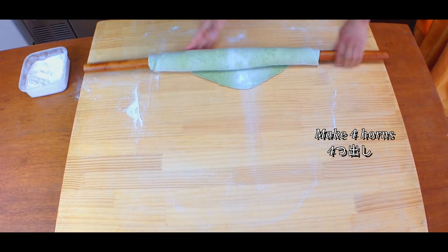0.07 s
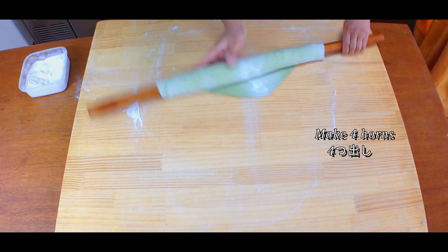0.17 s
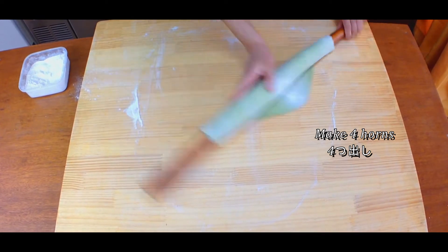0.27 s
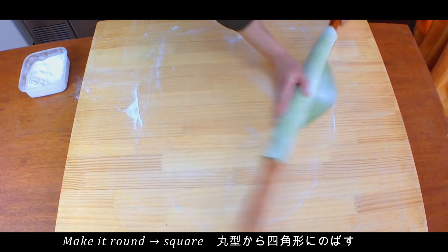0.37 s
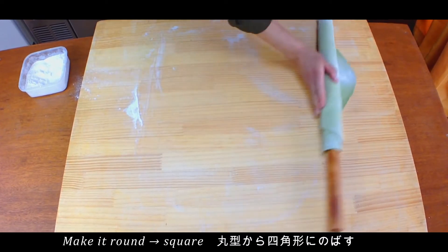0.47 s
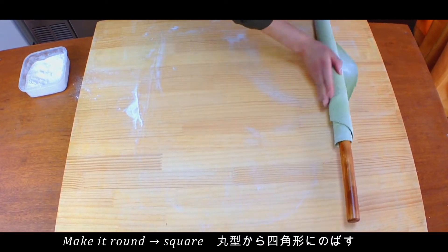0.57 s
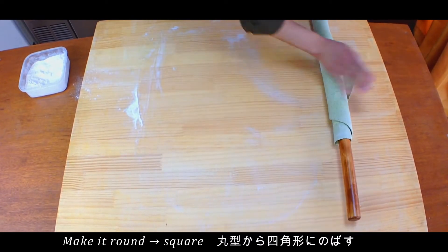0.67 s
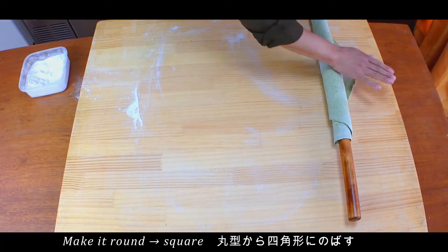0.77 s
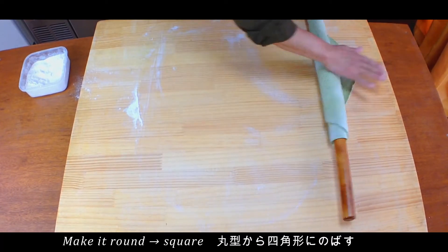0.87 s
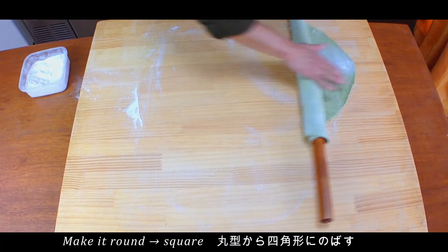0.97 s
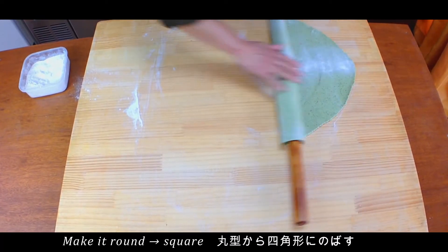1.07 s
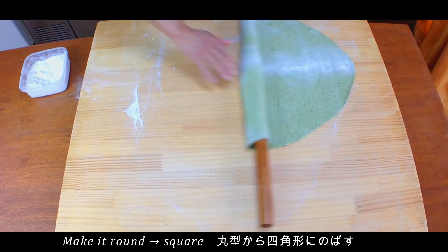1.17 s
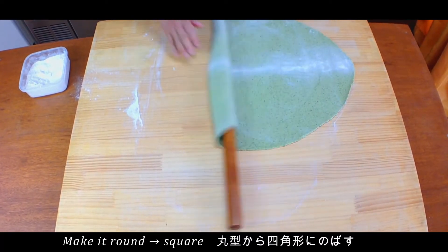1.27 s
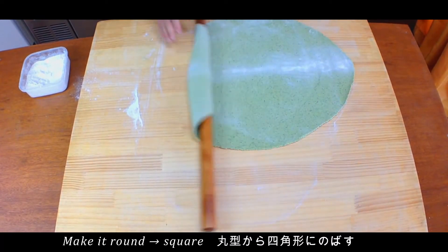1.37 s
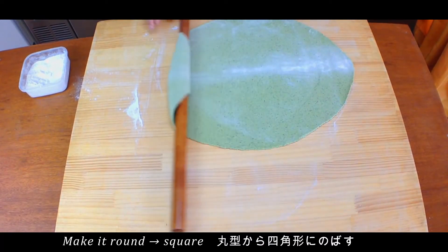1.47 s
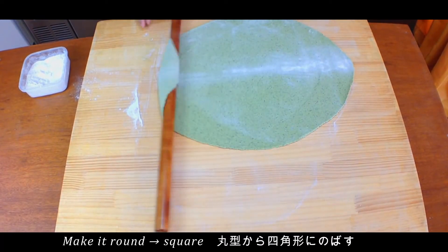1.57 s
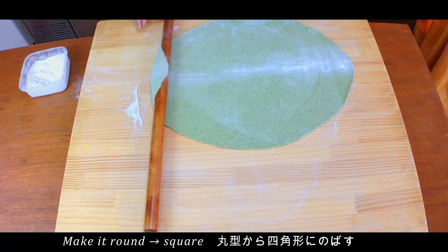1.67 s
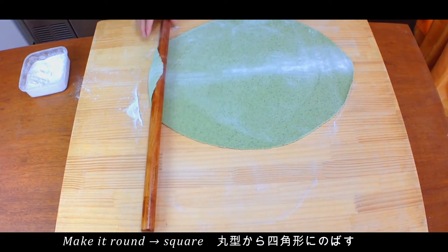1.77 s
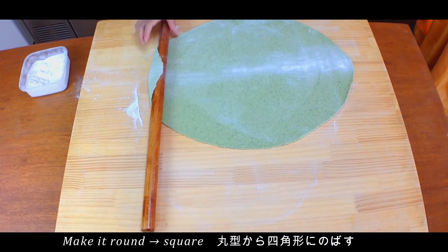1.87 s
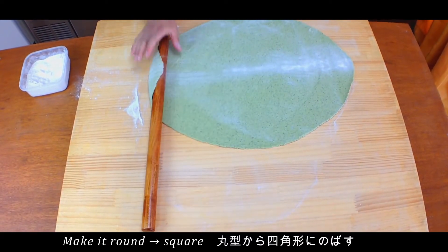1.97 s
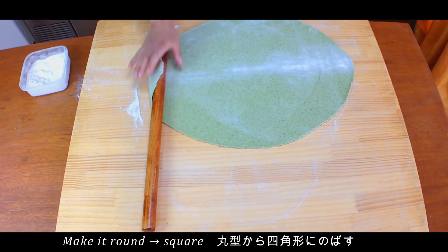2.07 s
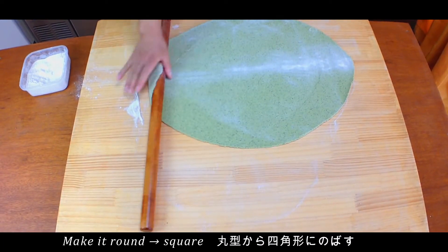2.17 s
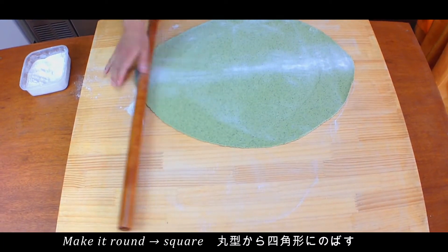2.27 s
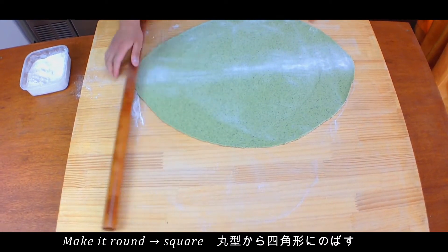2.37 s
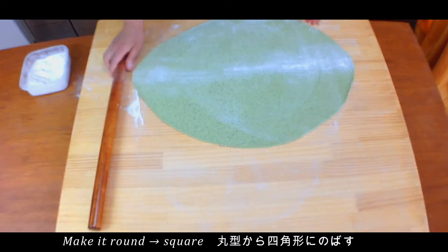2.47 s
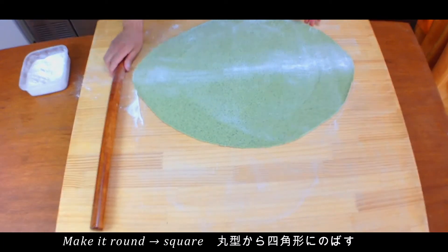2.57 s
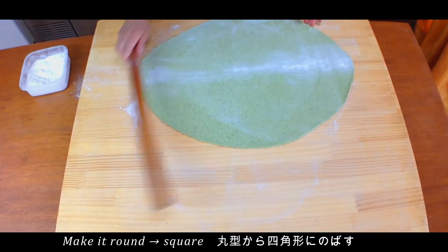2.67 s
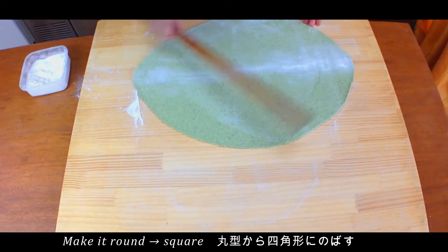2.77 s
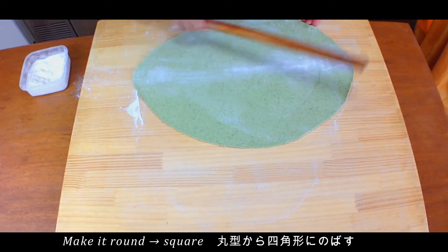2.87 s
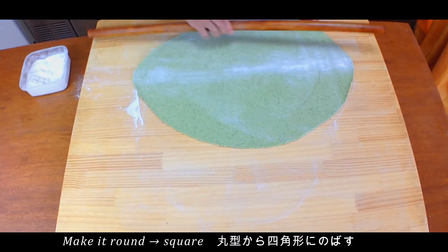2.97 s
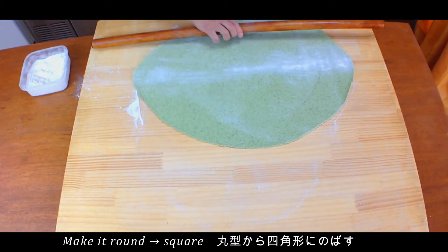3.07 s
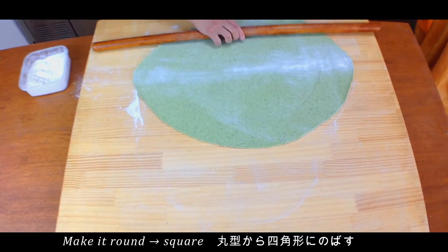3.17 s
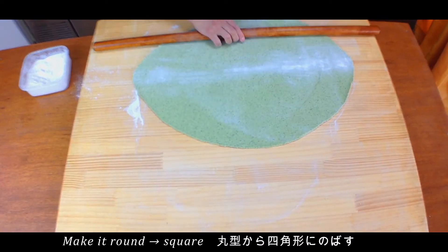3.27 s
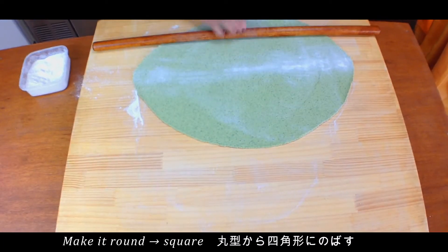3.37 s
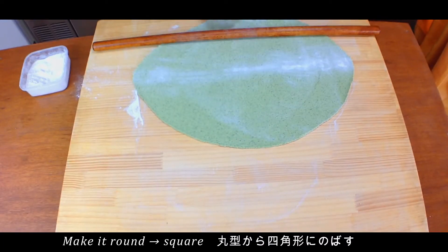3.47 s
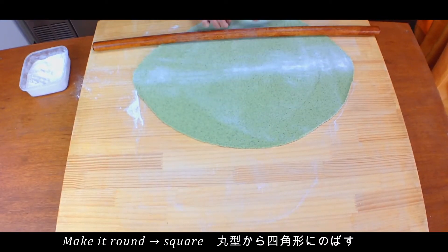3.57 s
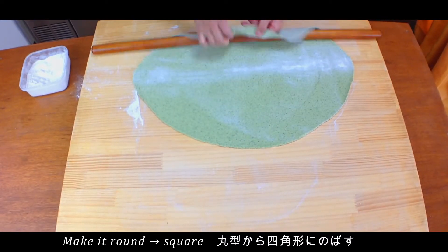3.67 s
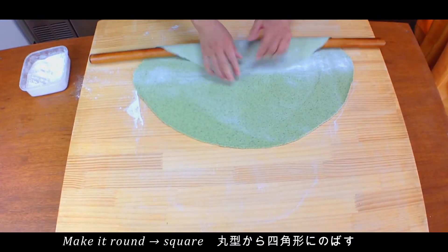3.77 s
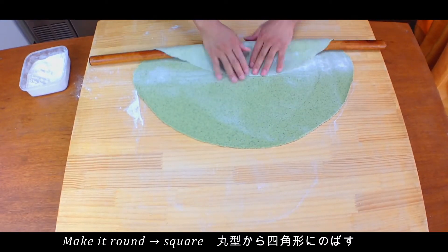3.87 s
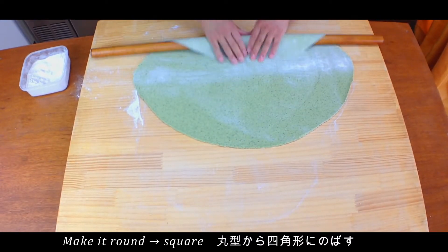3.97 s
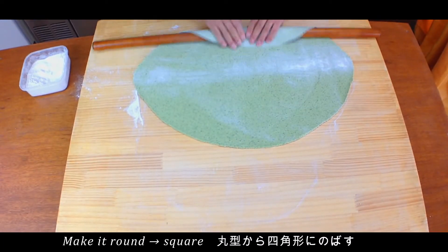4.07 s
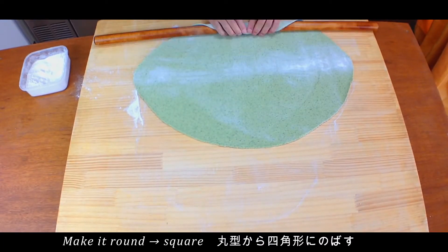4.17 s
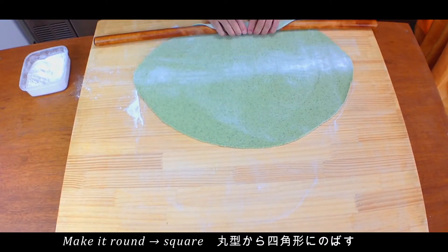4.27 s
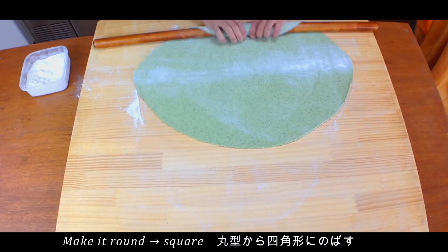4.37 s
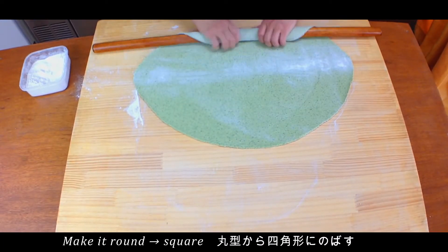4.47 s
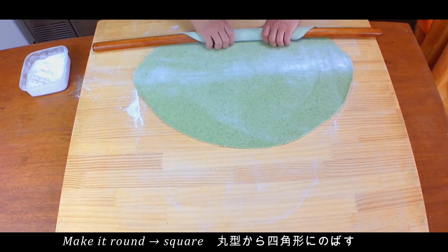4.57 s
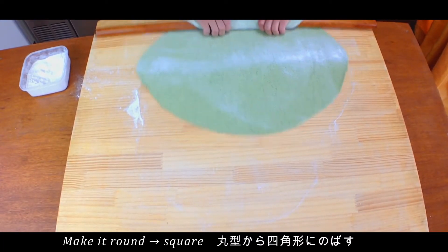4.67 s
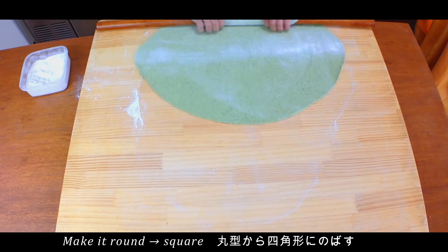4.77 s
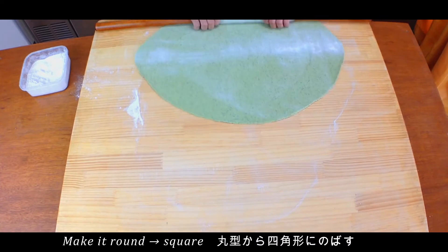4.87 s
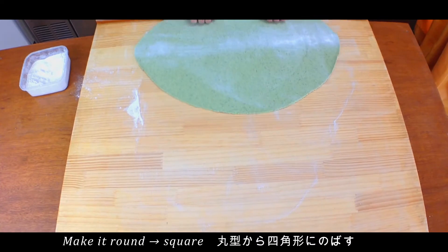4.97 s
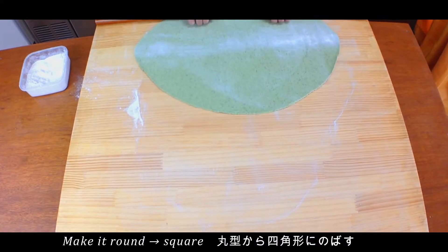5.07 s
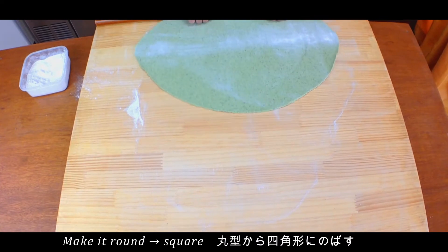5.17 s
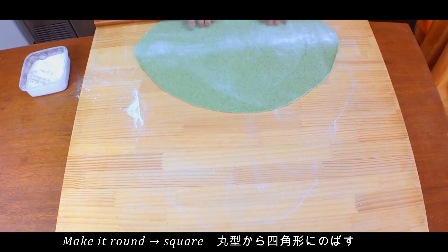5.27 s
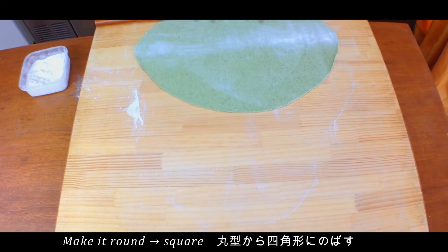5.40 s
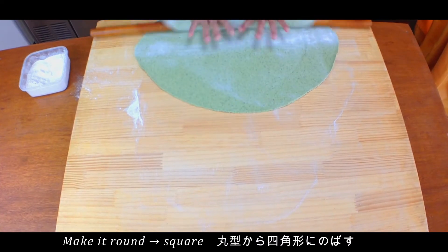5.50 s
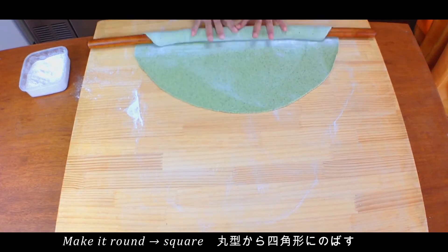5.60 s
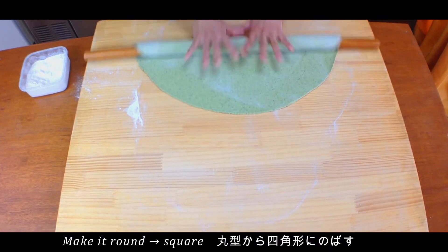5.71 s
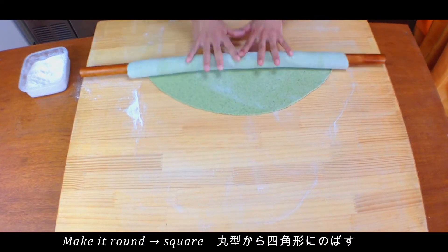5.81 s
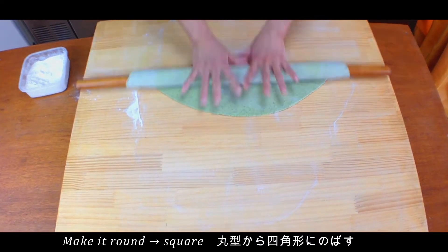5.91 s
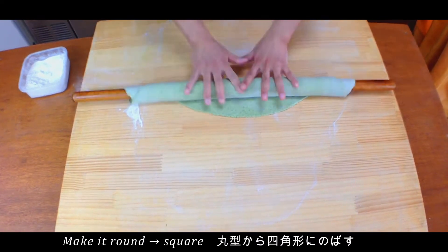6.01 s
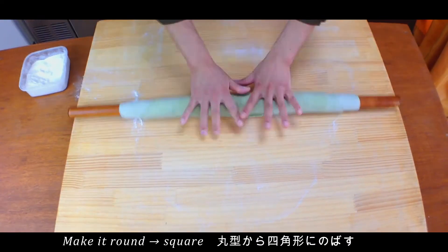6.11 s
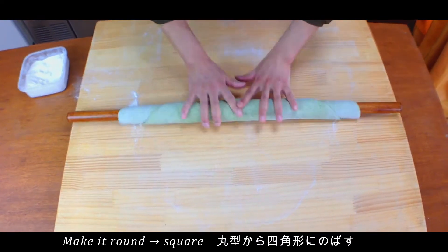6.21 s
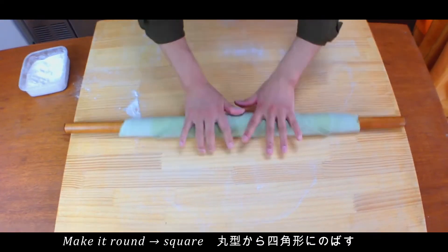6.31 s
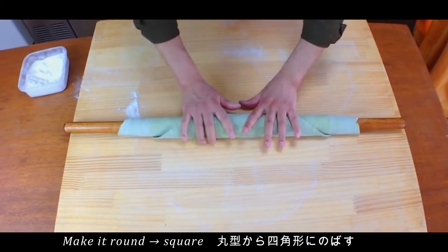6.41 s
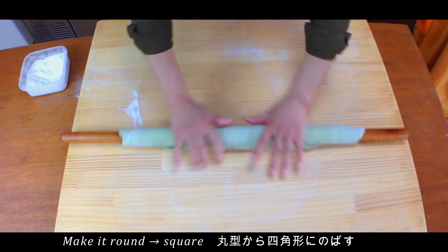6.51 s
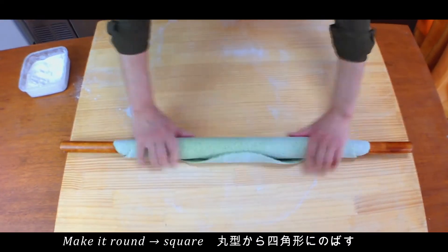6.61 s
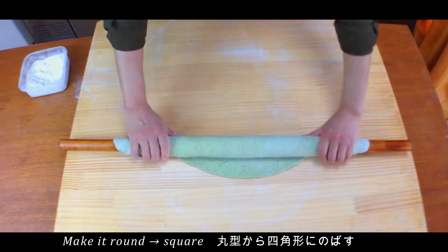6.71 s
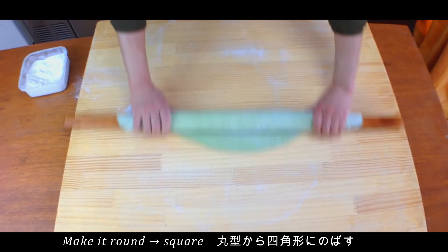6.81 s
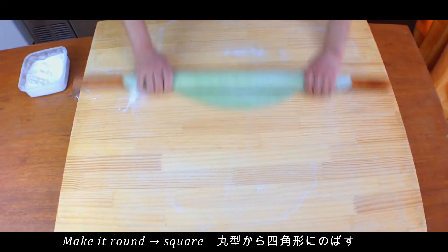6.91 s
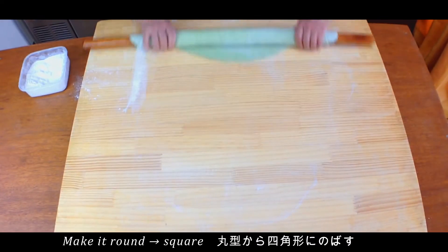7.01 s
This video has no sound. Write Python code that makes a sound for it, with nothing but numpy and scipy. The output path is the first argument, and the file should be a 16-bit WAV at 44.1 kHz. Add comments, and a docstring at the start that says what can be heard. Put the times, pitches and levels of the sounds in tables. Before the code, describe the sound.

A dry scrape of dough on a floured board gives way to quiet rolling. A wooden pin lands with a sharp, hollow clatter, and a second knock and a few faint taps follow. The dough shuffles in short pushes, then rumbles under the pin while hands pat it and its loose edge brushes the board. A raspy slide finishes. It is heard from nearby in a small kitchen, with slight echo and a low table tremble.

```python
"""Rolling out noodle dough

In a small kitchen, a long wooden pin wrapped in floured dough is dragged round and unrolled on a board.
The bare pin clatters down and is knocked into place twice: pin, board and table ring.
Then the dough is wound on again and rolled. It rubs on the flour, its loose edge flaps at each turn,
and palms thump on it, over a low tremble of the table and a faint hiss."""
import sys
import numpy as np
from scipy import signal
from scipy.fft import rfft, irfft, next_fast_len
from scipy.io import wavfile
from scipy.ndimage import uniform_filter1d, minimum_filter1d, map_coordinates

SR = 44100
rng = np.random.default_rng(int(sys.argv[2]) if len(sys.argv) > 2 else 0)


def int16_out(signal):
    """Quantize to a 16-bit WAV file."""
    q = np.round(np.clip(np.atleast_2d(signal).T, -1, 1) * 32767)
    wavfile.write(sys.argv[1], SR, q.astype(np.int16))


N = 310905

# Wood hitting wood. Each row: start in seconds, rise in seconds, clack level in dB, pitch in Hz above
# which the clack is dulled, crack level in dB, thud level in dB, pin level in dB, centre of the pin's
# ringing in Hz, its width in octaves, share of the full ringing time (1 is the longest).
KNOCKS = [(2.514, 0.0081, -44, 1700, -74, -65, -31.5, 1590, 0.37, 0.82),
          (2.528, 0.00027, -21, 3200, -45, -30, -27.5, 1440, 0.37, 0.77),
          (2.5456, 0.0015, -23.5, 3380, -65, -42, -46, 1600, 0.79, 0.46),
          (2.5558, 0.00045, -15.5, 3150, -38, -19.5, -22.5, 500, 0.47, 0.79),
          (3.241, 0.0047, -32.5, 2000, -65, -66, -36, 1100, 1.2, 0.39),
          (3.253, 0.0026, -28, 1900, -54, -53, -31.5, 750, 1.7, 1),
          (3.2656, 0.00044, -26, 1550, -36, -41.5, -19, 430, 1.22, 0.64),
          (3.762, 0.0041, -47.5, 4000, -65, -54, -51, 1860, 0.35, 0.27),
          (3.9214, .0002, -41, 2700, -61, -58, -57, 900, 1.1, 0.47),
          (3.9394, 0.00013, -36, 1290, -38.5, -55, -28.5, 739, 0.27, 0.24)]
# The tones of the pin as it bends. Each row: pitch in Hz, relative level in dB.
PIN_TONES = [(102, 5), (280, -1), (307, 2.5), (557, 0), (598, 0), (630, -5), (760, -16.5), (856, -6),
             (910, -4), (968, -1), (1115, -18.5), (1243, -5.5), (1390, -16.5), (1455, -12.5), (1550, -11.5),
             (1860, -11.5), (2040, -18.5), (2460, -9)]
# The tones of struck wood. Each row: pitch in Hz, relative level in dB, full ringing time in seconds.
BOARD_TONES = [(310.7, -8, 0.36), (372, -4.5, 0.097), (447.8, -6, 0.29), (534, -18, 0.077), (595, -2, .15),
               (820, -6, .14), (959, -8.5, 0.39), (1053, -1.5, 0.11), (1210, -0.5, 0.063), (1205, 5, 0.066),
               (1360, -17, 0.063), (1440, -5.5, 0.08), (1453, 0, 0.14), (1853, -5.5, 0.092),
               (2010, -18.5, 0.088), (2480, -7.5, 0.094), (3094, -8.5, .09)]  # board and table under a hard blow
THUD_TONES = [(154.6, 2.5, 0.13), (165.7, -11, 0.1), (211, -10, 0.072), (236, -10, 0.145),
              (58.6, -10.5, .45)]  # the board's whole top moving
# Pushes that slide the dough. Each row: fastest moment in seconds, seconds of speeding up,
# seconds of slowing down, strength in dB, dB added to that strength for the fizz.
PUSHES = [(.03, 0.18, 0.13, -55.5, -5), (.48, 0.38, 0.38, -37.5, 0), (.52, 0.018, .13, -36, -9),
          (1.1, 0.57, 0.36, -69, 3.5), (1.45, 0.33, 0.47, -59, -6), (2.42, .2, 0.78, -63, -3.5),
          (3.03, .08, .12, -62, -1), (3.24, .06, 0.081, -52, -7), (3.39, 0.12, 0.24, -46, -12),
          (3.79, 0.041, 0.12, -57, -1.5), (4.12, 0.14, 0.071, -51, -1), (4.23, 0.27, .15, -50.5, -4),
          (4.65, 0.22, 0.19, -52.5, -4.5), (4.831, .14, 0.13, -38.5, -3.5), (5.021, 0.056, 0.063, -49.5, 4),
          (5.09, 0.11, 0.083, -42.5, -3.5), (5.26, 0.053, 0.11, -52.5, 2), (6.762, .15, 0.23, -45, -2),
          (7.02, .18, 0.305, -34.5, 2.5)]
# The pin rolling. Each row: start in seconds, seconds at even speed, rumble level in dB, rub level in dB.
ROLLS = [(0.177, 0.524, -46.5, -59), (1.036, .52, -46, -62), (2.528, 0.23, -44, -62.5),
         (3.217, 0.31, -41, -56.5), (3.976, .32, -44.5, -65), (4.505, 0.56, -49.5, -64),
         (5.507, 1.42, -38.5, -58.5)]
# The loose edge brushing the board. Each row: start in seconds, level in dB, rough length in seconds.
FLAPS = [(0.182, -48, 0.029), (2.29, -59, .04), (3.762, -58, .05), (5.73, -43, 0.021), (5.932, -46, 0.0277),
         (6.115, -46, 0.039), (6.291, -45.5, .05), (6.479, -51, 0.042)]
# Soft blows of palms and wrapped pin. Each row: start in seconds, level in dB, rough pitch in Hz,
# level of the dough's slap in dB.
THUMPS = [(.18, -46, 150, -56), (1.08, -36, 45.4, -74), (1.693, -39, 61, -64), (3.351, -32, 97, -68),
          (4.02, -44, 115, -68), (4.572, -46, 250, -57), (4.799, -47, 305, -50), (5.003, -38, 247, -43),
          (5.096, -50, 189, -50), (5.532, -36.5, 92, -75), (5.662, -50.5, 203, -51.5),
          (5.739, -44, 135, -62), (5.947, -31.5, 71, -59), (6.116, -41.5, 92, -54),
          (6.164, -36.5, 262, -46.5), (6.371, -36, 251, -58), (6.40, -31.5, 79, -57),
          (6.566, -40, 222, -51.5), (6.755, -37.5, 132, -54.5), (6.828, -38.5, 248, -45.5)]

# The tone colours of the noises. Each row: frequency in Hz, relative level in dB.
CLACK_COLOUR = [(60, -17.5), (230, -3), (700, 2), (1200, 7), (2000, 0), (3000, -8), (4000, -17),
                (7000, -25), (15000, -11)]  # many wood tones close together
CRACK_COLOUR = [(300, 17), (1200, 5.5), (6300, -3.5), (8000, -16.5), (11000, -26.5), (15000, -29.5)]  # the instant of contact
RUB_COLOUR = [(100, -20), (300, -16), (520, -11.5), (850, -2.5), (1200, -2), (1600, -1.5), (2600, -6),
              (3600, -15.5), (6000, -14.5), (15000, -41)]  # dough sliding on the board
RASP_COLOUR = [(500, -31.5), (1100, -19), (1500, 0.5), (2100, 5), (2800, 0), (3600, -7.5), (8000, -37)]  # dough catching under pressure
FIZZ_COLOUR = [(1000, -19), (3000, -1.5), (4800, -0.5), (7500, -1.5), (9500, -6.5), (12000, -6.5),
               (15500, -13.5)]  # flour grains
ROLL_COLOUR = [(100, -4.5), (250, 0), (500, -2), (1000, 0), (1600, -4), (3000, -11), (6000, -13),
               (15000, -18.5)]  # dough pressed under the pin
SLAP_COLOUR = [(150, -8), (400, 1.5), (650, -2), (1100, -8.5), (1800, -16), (4000, -32), (10000, -45)]  # dough being hit
TREMBLE_COLOUR = [(8, -12), (20, 3.5), (35, -7), (58, -5), (80, -14.5), (120, -21), (200, -27),
                  (400, -49.5), (1000, -75.5)]  # the table shaking
HISS_COLOUR = [(30, -5.5), (150, -5), (300, -5), (600, -9), (1200, -13.5), (2500, -17), (6000, -19),
               (15500, -21)]  # the steady background
# The kitchen's echo. Each row: frequency in Hz, seconds it takes to fade by 60 dB.
ECHO_TIMES = [(100, 0.31), (500, 0.4), (1200, 0.36), (2700, 0.41), (5000, 0.21), (12000, 0.28)]


def knocks():
    """Each blow cracks, clacks, thuds and rings the pin; hands and dough cut the ringing short."""
    out, t = np.zeros(N), np.arange(SR // 2) / SR
    for start, rise, clack_db, dull_hz, crack_db, thud_db, pin_db, centre_hz, width, share in KNOCKS:
        clack_fade = fade(t, 0.19 * share) + 1.27 * fade(t, 0.032)
        burst = rng.standard_normal(len(t)) * clack_fade
        board_tones = [(hz, db, seconds * share) for hz, db, seconds in BOARD_TONES]
        board = ring(board_tones, t, flip_chance=0.45, scatter_db=0.5)
        wood = unit_blow(coloured(burst, CLACK_COLOUR)) + amp(-4) * unit_blow(board)
        clack = unit_blow(signal.lfilter(*signal.butter(2, dull_hz, fs=SR), wood))
        contact = rng.standard_normal(len(t)) * fade(t, 0.0045)
        crack = unit_blow(coloured(contact, CRACK_COLOUR))
        # the grip lets only the tones around one pitch ring freely
        free_tones = [(hz, db - 6 * (np.log2(hz / centre_hz) / width) ** 2, 0.26 * share)
                      for hz, db in PIN_TONES]
        pin = unit_blow(ring(free_tones, t, flip_chance=0, scatter_db=1))
        top = ring(THUD_TONES, t, flip_chance=0, scatter_db=1)
        # the thud's deepest bass, below about 85 Hz, is weak
        thud = unit_blow(signal.lfilter(*signal.butter(2, 85, 'high', fs=SR), top))
        blow = amp(clack_db) * clack + amp(crack_db) * crack + amp(pin_db) * pin - amp(thud_db) * thud
        add(out, start, blow * (1 - np.exp(-t / rise)))
    return out


def rubbing_dough():
    """Sliding dough rubs, rasps and faintly rings the pin; rolling is duller; flour fizzes above both."""
    def pin_boost(hz):
        return 7 + 0.5 * sum(1 / (1 + ((hz - tone_hz) / 12) ** 2) for tone_hz, _ in PIN_TONES)

    rub = unit(filtered(friction(RUB_COLOUR, slips_per_second=9000, flutter_db=-0.04), pin_boost))
    rasp = unit(filtered(friction(RASP_COLOUR, slips_per_second=2000, flutter_db=3), pin_boost))
    fizz = friction(FIZZ_COLOUR, slips_per_second=22000, flutter_db=1.38)
    roll = friction(ROLL_COLOUR, slips_per_second=5000, flutter_db=2.5)
    push_level, push_fizz = push_levels()
    _, roll_level = roll_levels()
    effort = (push_level / amp(-34.5)) ** 0.65  # makes the rasp grow faster than the rub
    return (amp(-2.5) * np.hypot(push_level, edge_drag_level()) * rub
            + amp(-2) * effort * push_level * rasp
            + roll_level * roll
            + np.hypot(push_fizz, amp(-5.5) * roll_level) * fizz)


def friction(colour, slips_per_second, flutter_db):
    """Countless tiny slips of uneven size make a noise that flutters with the pressure."""
    sizes = np.sqrt(rng.exponential(size=N)) * rng.standard_normal(N)
    slips = sizes * (rng.random(N) < slips_per_second / SR)
    return unit(coloured(slips, colour) * amp(flutter_db * wobble(45)))


def push_levels():
    """How strong rub and fizz are over time: each push smoothly speeds up and slows down."""
    t, rub, fizz = np.arange(N) / SR, np.zeros(N), np.zeros(N)
    for fastest, rise, fall, db, fizz_db in PUSHES:
        phase = np.clip((t - fastest) / np.where(t < fastest, rise, fall), -1, 1)
        speed = np.abs(np.cos(np.pi / 2 * phase))
        push = amp(db) * speed ** 1.81  # faster is louder
        rub, fizz = np.hypot(rub, push), np.hypot(fizz, amp(fizz_db) * push)
    return rub, fizz


def roll_levels(set_off_seconds=0.019, stop_seconds=0.066):
    """How strong rumble and rub are over time: the pin sets off, rolls evenly and comes to rest."""
    t, rumble, rub = np.arange(N) / SR, np.zeros(N), np.zeros(N)
    for start, length, rumble_db, rub_db in ROLLS:
        speed = np.interp(t - start, np.cumsum([0, set_off_seconds, length, stop_seconds]), [0, 1, 1, 0])
        rumble += amp(rumble_db) * speed
        rub += amp(rub_db) * speed
    return rumble, rub


def thumps():
    """A cushioned blow stirs only the table's low tones, while the dough gives a small slap."""
    out, t = np.zeros(N), np.arange(SR // 3) / SR
    for start, db, pitch_hz, slap_db in THUMPS:
        seconds = 0.046 * 2 ** ((-37.5 - db) / 15)  # a blow 15 dB harder is half as long
        press = swell(t, seconds)
        cushion = lambda hz: (hz / pitch_hz) ** 1.06 / (1 + (hz / pitch_hz) ** 12) ** 0.5
        low_noise = filtered(rng.standard_normal(len(t)), cushion)
        thump = unit(low_noise * press) * np.sqrt(np.mean(press ** 2))
        slap = coloured(rng.standard_normal(len(t)), SLAP_COLOUR) * press
        add(out, start, amp(db) * thump + amp(slap_db) * slap)
    return out


def edge_flaps():
    """Once a turn, the dough's loose edge swishes over the flour."""
    touch, t = np.zeros(N), np.arange(SR // 3) / SR
    for start, db, length in FLAPS:
        add(touch, start, amp(db) * swell(t, length))
    swish_colour = [(500, -17.5), (3500, -11.5), (5500, -4), (9000, -6.5), (15500, -10)]
    return touch * coloured(rng.standard_normal(N), swish_colour)


def edge_drag_level():
    """How strongly the loose edge rubs as it is dragged along after each flap."""
    rub, t = np.zeros(N), np.arange(SR // 3) / SR
    for start, db, _ in FLAPS:
        add(rub, start, amp(db - 8.5) * swell(t, seconds=0.079))
    return rub


def kitchen_echo(sound):
    """The walls answer after 5 milliseconds; each frequency dies away at its own speed."""
    hz, t, noise = signal.stft(rng.standard_normal(SR // 2), SR, nperseg=256)
    _, tail = signal.istft(noise * fade(t, look_up(ECHO_TIMES, hz)[:, None]), SR, nperseg=256)
    tail = np.pad(tail / np.linalg.norm(tail), (SR // 200, 0))
    return signal.fftconvolve(sound, tail)[:N]


def background(resting_db=-49, hiss_db=-58.5):
    """The table trembles, low and uneven, and more under the rolling pin, over a steady hiss."""
    rumble_level, _ = roll_levels()
    tremble = unit(coloured(rng.standard_normal(N), TREMBLE_COLOUR) * amp(1.74 * wobble(9)))
    hiss = coloured(rng.standard_normal(N), HISS_COLOUR)
    return np.hypot(amp(resting_db), rumble_level) * tremble + amp(hiss_db) * hiss


def ring(tones, t, flip_chance, scatter_db):
    """Struck wood rings in fading tones of uneven strength; each may start the opposite way."""
    out = np.zeros(len(t))
    for hz, db, seconds in tones:
        direction = np.sign(rng.random() - flip_chance)
        strength = amp(db + scatter_db * rng.standard_normal())
        out += direction * strength * np.sin(2 * np.pi * hz * t) * fade(t, seconds)
    return out


def fade(t, seconds):
    """A level that drops by 60 dB in the given time."""
    return amp(-60 * t / seconds)


def swell(t, seconds):
    """A soft touch: rises to 1 in a third of the given time, then dies away."""
    progress = 3 * t / seconds
    return progress * np.exp(1 - progress)


def wobble(rate):
    """A smooth curve through random points, rate of them each second."""
    return map_coordinates(rng.standard_normal(int(N * rate / SR) + 4), [np.arange(N) * rate / SR])


def amp(db):
    """Turn dB into a number to multiply by."""
    return 10 ** (np.asarray(db) / 20)


def unit(sound):
    """Scale a sound to an average power of 1."""
    return sound / np.sqrt(np.mean(sound ** 2) + 1e-20)


def unit_blow(sound):
    """Scale a blow to an average power of 1 over its first thirtieth of a second."""
    return sound / np.sqrt(np.mean(sound[:SR // 30] ** 2) + 1e-20)


def look_up(table, hz):
    """Read between the rows of a frequency table, with octaves evenly spaced."""
    row_hz, values = np.transpose(table)
    return np.interp(np.log(hz + 1), np.log(row_hz + 1), values)


def filtered(sound, gain_at):
    """Multiply each frequency in a sound by gain_at(hz)."""
    size = next_fast_len(len(sound) + SR // 4)
    hz = np.fft.rfftfreq(size, 1 / SR)
    return irfft(rfft(sound, size) * gain_at(hz), size)[:len(sound)]


def coloured(sound, colour):
    """Give a sound a tone colour and an average power of 1."""
    return unit(filtered(sound, lambda hz: amp(look_up(colour, hz))))


def add(track, start, sound):
    """Mix a sound into a track, starting at a time in seconds."""
    part = track[round(start * SR):][:len(sound)]
    part += sound[:len(part)]


def scene():
    """Hard wood and soft dough, each with its echo, over the background."""
    wood = knocks()
    dough = rubbing_dough() + edge_flaps() + thumps()
    return wood + amp(-6) * kitchen_echo(wood) + dough + amp(-6.5) * kitchen_echo(dough) + background()


def record(dry):
    """A limiter briefly turns down the hardest knock; then the very highest treble is cut off."""
    ceiling, top_hz = 0.85, 15500
    needed_gain = np.minimum(1, ceiling / (np.abs(dry) + 1e-9))
    smooth_gain = uniform_filter1d(minimum_filter1d(needed_gain, size=265), size=131)
    return filtered(dry * smooth_gain, lambda hz: hz < top_hz)


dry = scene()
out = record(dry)
int16_out(out)
```